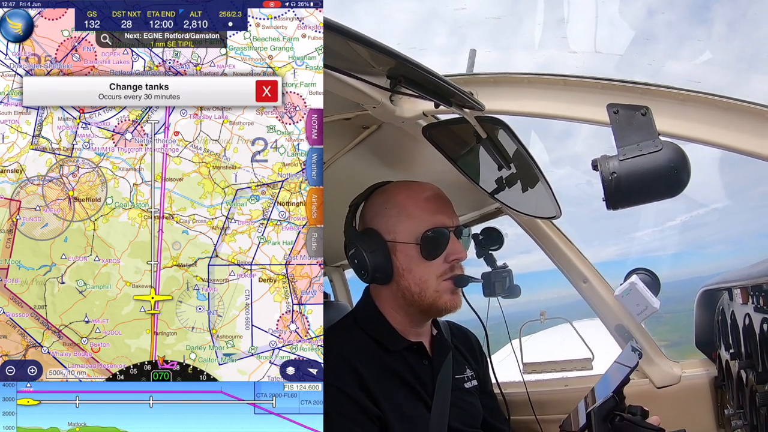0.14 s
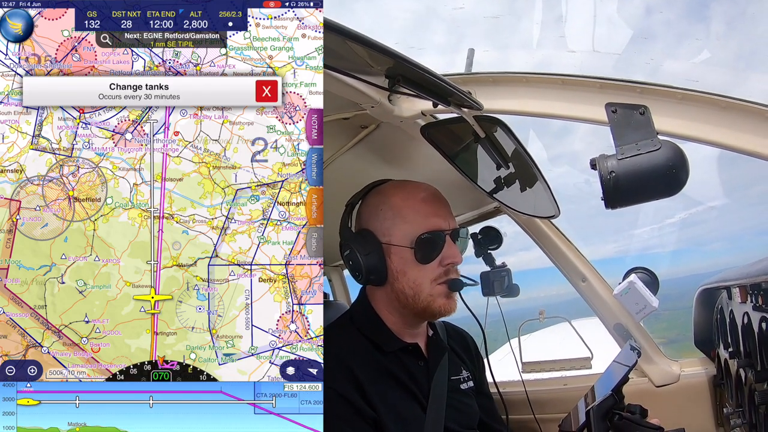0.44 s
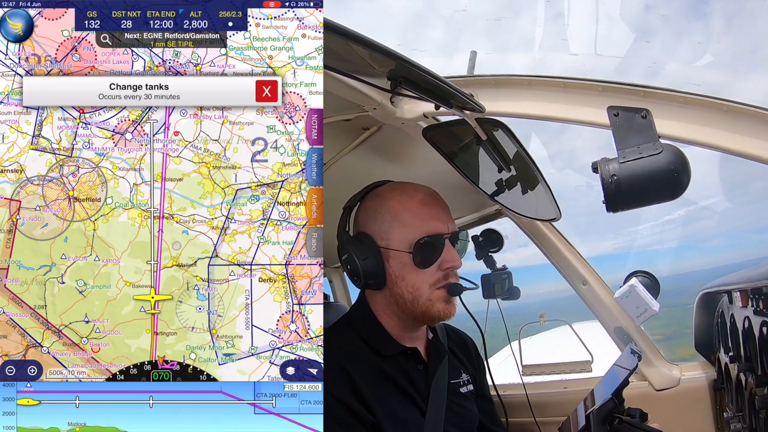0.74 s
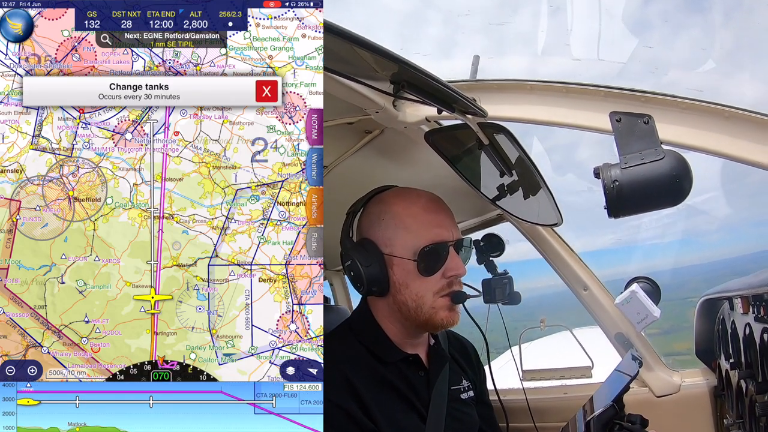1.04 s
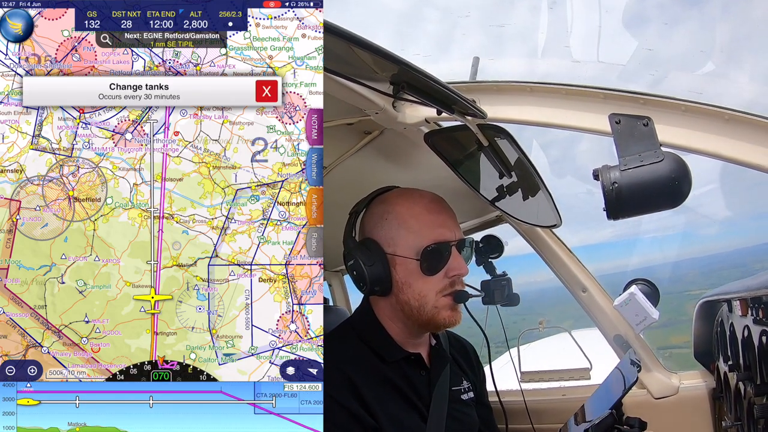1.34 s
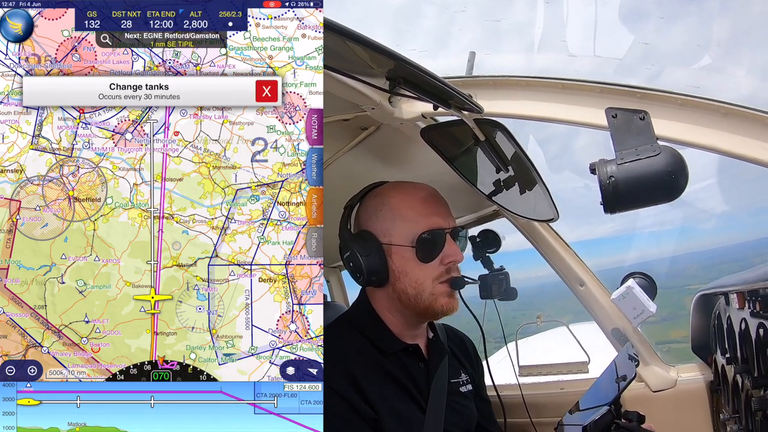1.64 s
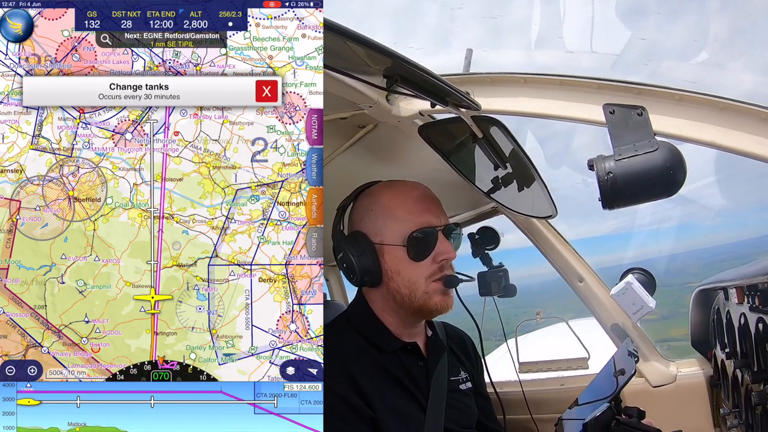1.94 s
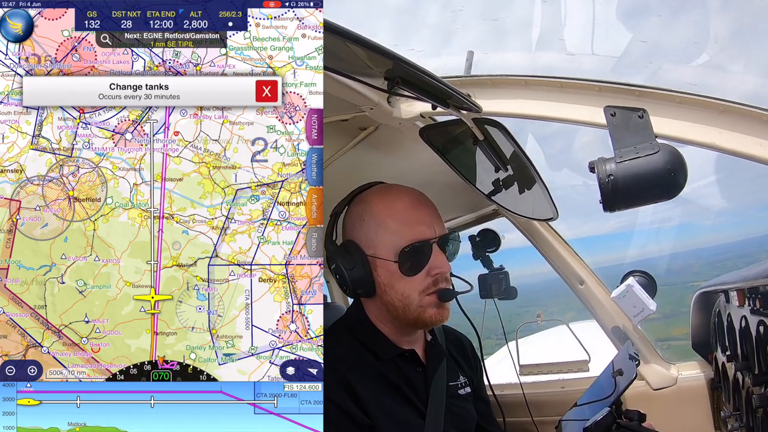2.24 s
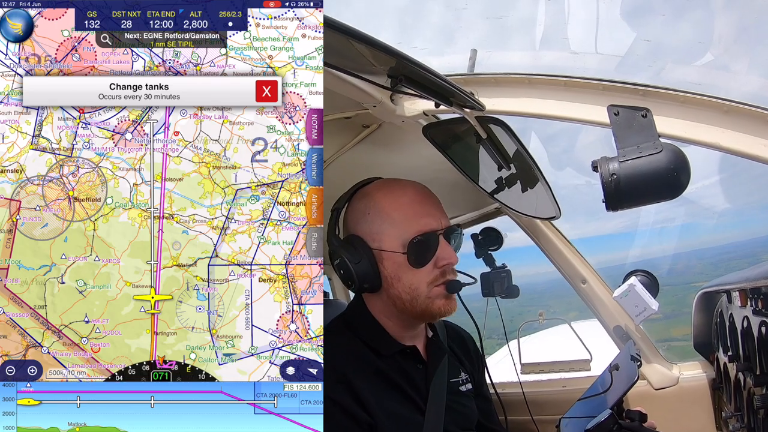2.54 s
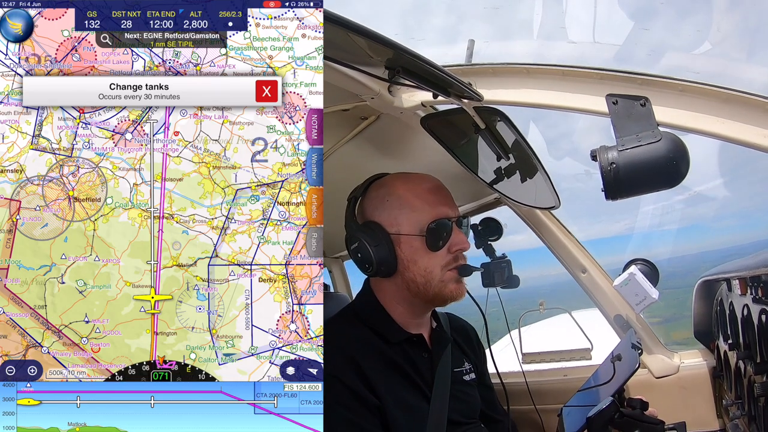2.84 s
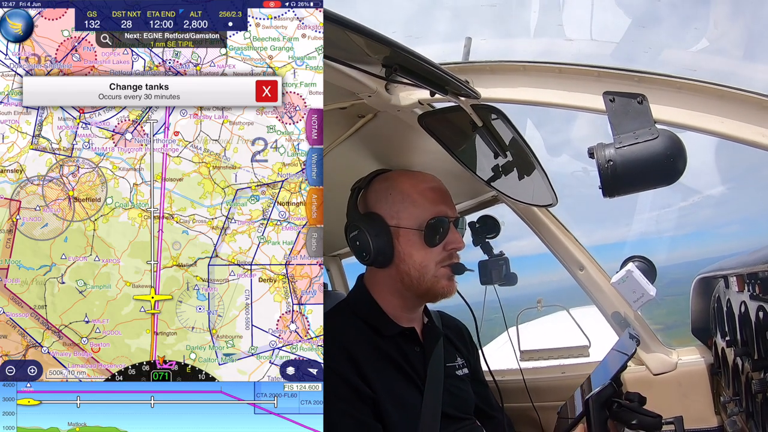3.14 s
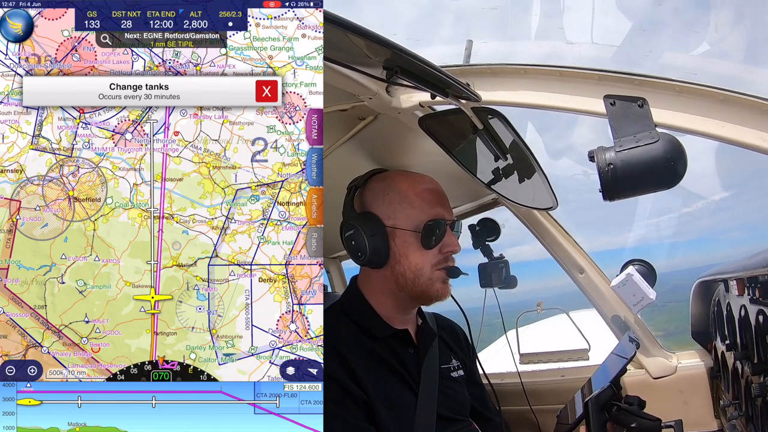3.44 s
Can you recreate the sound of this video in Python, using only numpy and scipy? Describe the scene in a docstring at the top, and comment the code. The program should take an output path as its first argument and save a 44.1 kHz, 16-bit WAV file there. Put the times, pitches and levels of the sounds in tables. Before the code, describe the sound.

Steady light-aircraft engine drone from start to finish, deep and gently pulsing, with faint exhaust and valve clatter and broad wind noise all around; a close, enclosed cabin perspective from a microphone inside the cockpit.

```python
"""A low, wavering hum: a four-cylinder piston engine and its propeller cruise inside a small cockpit.
The hum is a stack of shaft, firing and blade tones that wander with uneven combustion.
A dense buzz, one pattern repeating every two shaft turns, adds exhaust and valve clatter.
Behind lies the roar of slipstream and machinery: noise coloured differently at each side by the cabin."""
import sys
import numpy as np
from scipy import signal
from scipy.fft import rfft, irfft
from scipy.io import wavfile
from scipy.ndimage import uniform_filter1d, minimum_filter1d

SR = 44100
rng = np.random.default_rng(int(sys.argv[2]) if len(sys.argv) > 2 else 0)


def generate_wav(sig):
    """Save sig (samples, or channels by samples) to the path in sys.argv[1] as 16-bit PCM at SR."""
    pcm = np.round(np.clip(np.atleast_2d(sig).T, -1, 1) * 32767).astype(np.int16)
    wavfile.write(sys.argv[1], SR, pcm)


N = 158760  # samples, 3.6 s

# crankshaft speed before jitter: t/s, turns per second/Hz
SHAFT_SPEED = [(0.0, 39.82), (0.45, 39.85), (0.9, 39.78), (1.35, 39.8), (1.8, 39.78), (2.25, 39.76),
               (2.7, 39.68), (3.15, 39.65), (3.6, 39.71)]
# engine and propeller tones: multiple of shaft speed (played at the nearest half),
# level/dB before swell and HUM_DB, left minus right/dB, left phase lead/rad
ENGINE_TONES = [(0.998, -33.7, -2, 0.21), (1.507, -44, 2, 0.11), (1.988, -30.5, -4, 0.15),
                (2.494, -37.0, -3, -0.0), (3.032, -29.5, 3.5, -0.5), (4.022, -34, -1, -0.2),
                (4.507, -40.2, -1, -0.0), (4.96, -54, 10, 0.0), (5.47, -46, -2, -0.1),
                (5.98, -39.5, 6, 0.22), (7.06, -48, -3, -0.2), (7.455, -47, -9, -0.2),
                (7.97, -45.5, 1, 0.2), (9.05, -36, 2.5, 0.0), (9.55, -50.5, 4, -0.0), (9.99, -47, 2, -0.1),
                (10.49, -49, 0, -0.3), (12, -44, -4, 0.1), (12.38, -54, 15, -0.0021), (12.93, -55, 4, -0.4),
                (15.02, -52, 6, 0.68), (17.1, -47, -2, -0.4), (17.93, -58, -6, -0.1), (19.2, -56, -8, -0.9),
                (22.45, -55.5, -11, -0.68), (23.5, -62, -15, 0.6)]
# swell of the 80 Hz firing tone: t/s, added level/dB
FIRING_SWELL = [(0.0, 2.5), (0.48, -2), (1.2, -2.5), (1.68, 2), (2.16, -2), (3.12, -2.5), (3.36, 2.5),
                (3.6, -0.8)]
# swell of the 120 Hz hum: t/s, added level/dB
HUM_SWELL = [(0.0, -3.7), (0.72, 1.7), (1.2, -2.5), (1.44, -1.5), (1.92, 1.2), (2.64, 1), (3.6, 1.9)]
# swell of the 360 Hz drone: t/s, added level/dB
DRONE_SWELL = [(0.0, 1.5), (0.24, -2.5), (0.48, -4.5), (0.72, -0.8), (1.2, 0), (1.44, 1.5), (1.92, -2.5),
               (2.4, -3.5), (2.64, 2.2), (2.88, 4), (3.12, -0.8), (3.6, 1.3)]
# broad colour of the roar at the left: f/Hz, relative level per Hz/dB
ROAR_COLOUR_LEFT = [(10, -21), (27, 1), (46, -8), (60, 3), (85, 0), (168, -5), (576, -17), (763, -13),
                    (894, -18.8), (1100, -14.5), (1570, -18.5), (1810, -16), (1930, -20.5), (2370, -12),
                    (2590, -20.5), (2750, -15), (2890, -18.5), (3110, -20), (3300, -25), (3420, -22.5),
                    (4160, -31), (4370, -24.5), (4650, -32.8), (7390, -31.5), (8770, -35.5), (9320, -31),
                    (10300, -41), (10900, -53), (11200, -48), (11500, -55.6), (15000, -55.5)]
# broad colour of the roar at the right: f/Hz, relative level per Hz/dB
ROAR_COLOUR_RIGHT = [(10, -21), (27, -12), (46, -13), (60, 2.5), (85, 0), (168, -4.5), (353, -11),
                     (414, -14.5), (872, -16.5), (986, -14.5), (1340, -17.5), (1400, -13), (1690, -17.5),
                     (1860, -14.5), (1980, -15.5), (2210, -18), (2460, -18), (2780, -18.5), (5190, -32.5),
                     (5450, -27), (5650, -32), (6080, -27.5), (7040, -32), (7390, -27.5), (7760, -31.5),
                     (8550, -34), (10400, -43.5), (10900, -52.6), (11200, -49), (11500, -56.8),
                     (11900, -55), (15000, -57)]
# likeness of the roar at the two sides: f/Hz, coherence (0-1), left phase lead/rad
SIDE_LIKENESS = [(20,1,0),(128,.94,-0.06),(247,0.91,0),(409,.92,0),(760,0.78,-0.4),(920,.68,0),(1050,0.72,0),(1200,.64,.5),(1420,0.86,-0.2),(1530,0.13,1),(1620,.68,-0.8),(1735,.5,0),(1880,0.6,1.85),(2010,0.6,.1),(2200,.62,1.34),(2350,0.63,0.36),(2700,0.2,.5),(2790,0.64,.5),(3020,.64,-.9),(3490,.68,-0.3),(3890,0.6,0.5),(4370,0.76,0),(5040,0.1,-1),(5650,.38,-3),(6200,.08,-2),(6760,0.26,-1),(8000,0.07,0.5),(8560,.1,-3),(9440,0.14,0.5),(10300,.05,0),(11200,.45,0),(12300,.18,0),(14000,0.2,-2)]
# narrow cabin resonances in the roar: f/Hz, width/Hz, left lift/dB, right lift/dB
CABIN_RESONANCES = [(525, 27, 0.5, -1), (745, 26, 0.5, 1.5), (1013, 30, 3.5, 2), (1180, 25, 3, 1),
                    (1422, 41, 1.5, 3.5), (1760, 28, 2, 0.5), (1966, 58, 3, -0.5), (2183, 30, 3.5, 4),
                    (2356, 42, 2.5, 2.5), (2770, 33, 2, 3.5), (2880, 50, 2.5, 4.5), (3114, 44, 4.5, 4.5)]

HUM_DB, BUZZ_DB, ROAR_DB = 0.5, -43, -23.5  # hum: trim on its tones; buzz and roar: rms level
WAVER, WAVER_PER_ORDER, WAVER_HZ = 0.091, 0.024, 3.5  # depth and rate of each tone's wander
SHAFT_JITTER, JITTER_HZ = 0.00129, 7.6  # depth of speed unevenness (times drift) and its rate
BUZZ_LOW_HZ, BUZZ_HIGH_HZ = 550, 2600  # band of the dense upper engine orders
PATCH_DB = 0.84  # local patches of turbulence, rms
FLUTTER_DB, FLUTTER_HZ, FLUTTER_ABOVE_HZ = 0.46, 16, 2500  # treble flutter: rms, rate, crossover
RIPPLE_DB, RIPPLE_STEP_HZ, RIPPLE_ABOVE_HZ = 1.34, 21.95, 550  # fine colour, fading out downwards
LIMIT_DB, LIMIT_S = -11.5, 0.015  # peak limiter: threshold and reaction time
EDGE_HZ = 15150  # top of the band


def shaft_angle():
    """Crankshaft angle in radians: the running sum of a slightly uneven speed."""
    hz = np.interp(np.arange(N) / SR, *np.transpose(SHAFT_SPEED))
    uneven_hz = hz * (1 + SHAFT_JITTER * drift(JITTER_HZ).real)
    return 2 * np.pi * np.cumsum(uneven_hz) / SR


def hum(angle):
    """Wavering tones at whole and half shaft orders; higher ones waver more, and 2, 3 and 9 swell."""
    out, t = np.zeros((2, N)), np.arange(N) / SR
    side = np.array([[.5], [-.5]])  # left, right: splits balance and phase lead evenly
    swells = {2: FIRING_SWELL, 3: HUM_SWELL, 9: DRONE_SWELL}
    for multiple, db, balance_db, lead in ENGINE_TONES:
        order = round(2 * multiple) / 2
        if order in swells:
            db = db + np.interp(t, *np.transpose(swells[order]))
        waver = unit(1 + (WAVER + WAVER_PER_ORDER * order) * drift(WAVER_HZ))
        start_phase = 2 * np.pi * rng.random()
        tone = waver * np.exp(1j * (order * angle + start_phase))
        gain = np.sqrt(2) * amp(db + side * balance_db)  # level is rms, hence the root of 2
        out += gain * (tone * np.exp(1j * side * lead)).real
    return amp(HUM_DB) * out


def buzz(angle, size=4096):
    """Exhaust and valve clatter: a band-shaped pattern that repeats every two shaft turns."""
    hz = np.arange(size // 2 + 1) * np.mean(np.transpose(SHAFT_SPEED)[1]) / 2
    rise = (hz / BUZZ_LOW_HZ) ** 4 / (1 + (hz / BUZZ_LOW_HZ) ** 4)
    fall = 1 / (1 + (hz / BUZZ_HIGH_HZ) ** 4)
    random_phase = np.exp(2j * np.pi * rng.random((3, len(hz))))
    common, left, right = irfft(rise * fall * random_phase)
    place = angle / (4 * np.pi) % 1 * size  # position within the pattern
    sides = np.array([np.interp(place, np.arange(size), common + own) for own in (left, right)])
    return amp(BUZZ_DB) * unit(sides)


def roar():
    """Turbulent air and machinery noise heard through the cabin; its treble flutters."""
    white = patchy_noise()
    hz = np.fft.rfftfreq(N, 1 / SR)
    spectrum = rfft(white) * cabin(hz)
    upper = hz ** 2 / (hz ** 2 + FLUTTER_ABOVE_HZ ** 2)
    flutter = amp(FLUTTER_DB * unit(drift(FLUTTER_HZ).real))
    steady_part = irfft(spectrum * (1 - upper), N)
    treble_part = flutter * irfft(spectrum * upper, N)
    return amp(ROAR_DB) * unit(steady_part + treble_part)


def patchy_noise():
    """Stereo white noise with local patches in level; the sides share part of it at each frequency."""
    hz, frames = np.fft.rfftfreq(4096, 1 / SR), N // 1024 + 5
    a, b, c, d, patches = rng.standard_normal((frames, len(hz), 5)).T
    patches = uniform_filter1d(patches, size=3, axis=1)  # smooth over time
    patches = unit(uniform_filter1d(patches, size=20, axis=0))  # smooth over frequency
    f, same, lead = np.transpose(SIDE_LIKENESS)
    like = np.interp(np.log(hz + 1), np.log(f + 1), np.clip(same, 0, 1) * np.exp(-1j * lead))[:, None]
    left = a + 1j * b
    right = like * left + np.sqrt(abs(1 - abs(like) ** 2)) * (c + 1j * d)
    z = np.array([left, right]) * amp(PATCH_DB * patches)
    return signal.istft(z, nperseg=4096, noverlap=3072)[1][:, :N]


def cabin(hz):
    """Gain of the roar at each side: broad colour, narrow resonances and a ripple of small cabin modes."""
    db = np.array([read(ROAR_COLOUR_LEFT, hz), read(ROAR_COLOUR_RIGHT, hz)])
    for centre, width, left_db, right_db in CABIN_RESONANCES:
        peak = 1 / (1 + (2 * (hz - centre) / width) ** 2)
        db += np.outer([left_db, right_db], peak)
    ripple = np.interp(hz / RIPPLE_STEP_HZ, np.arange(2000), rng.standard_normal(2000))
    return amp(db + RIPPLE_DB * ripple * hz / (hz + RIPPLE_ABOVE_HZ))


def drift(rate_hz, size=2048):
    """Slow complex random wander of rms about 1, up to about the given rate."""
    hz = np.fft.fftfreq(size, N / SR / size)
    noise = rng.standard_normal(size) + 1j * rng.standard_normal(size)
    slow = np.fft.ifft(noise * np.exp(-(hz / rate_hz) ** 2))
    return np.interp(np.linspace(0, size - 1, N), np.arange(size), unit(slow))


def amp(db):
    """Decibels to gain."""
    return 10 ** (np.asarray(db) / 20)


def unit(x):
    """Scales to rms 1."""
    return x / np.sqrt(np.mean(abs(x) ** 2) + 1e-20)


def read(points, hz):
    """Reads a table on a log-frequency axis."""
    f, value = np.transpose(points)
    return np.interp(np.log(hz + 1), np.log(f + 1), value)


def scene():
    """Hum and buzz follow one crankshaft; the roar surrounds them."""
    angle = shaft_angle()
    return hum(angle) + buzz(angle) + roar()


def record(dry):
    """A gentle peak limiter shared by both sides, then the band limit."""
    span = max(round(LIMIT_S * SR), 1)
    need = np.minimum(1, amp(LIMIT_DB) / (abs(dry).max(0) + 1e-9))
    gain = uniform_filter1d(minimum_filter1d(need, span), span) ** .5  # half the reduction in dB
    lowpass = signal.firwin(511, EDGE_HZ, window=("kaiser", 9), fs=SR)
    return signal.oaconvolve(dry * gain, lowpass[None], "same")


dry = scene()
out = record(dry)
generate_wav(out)
```